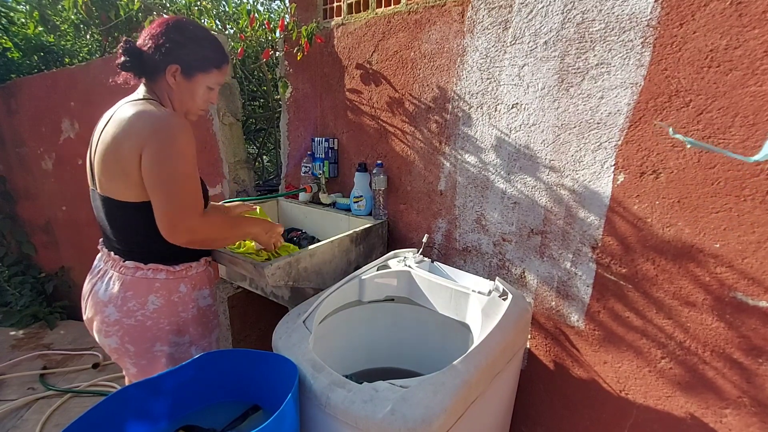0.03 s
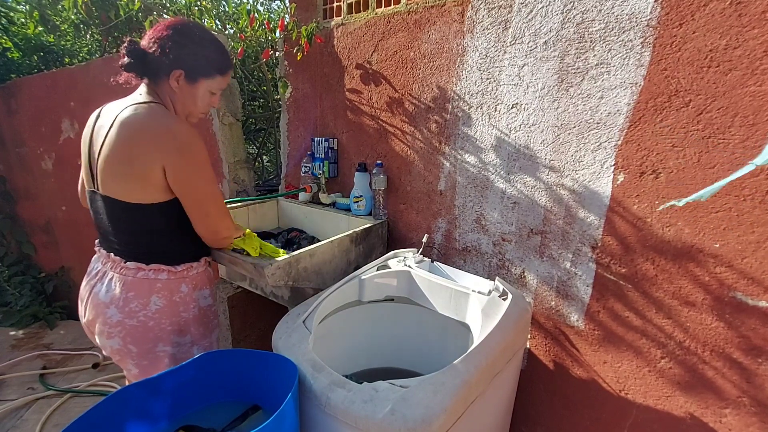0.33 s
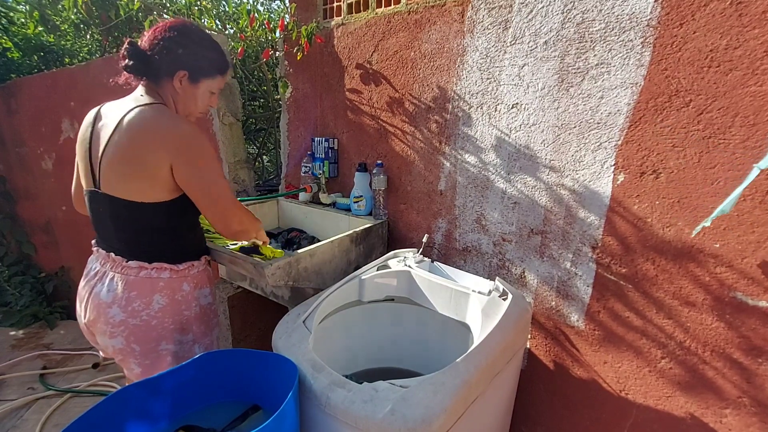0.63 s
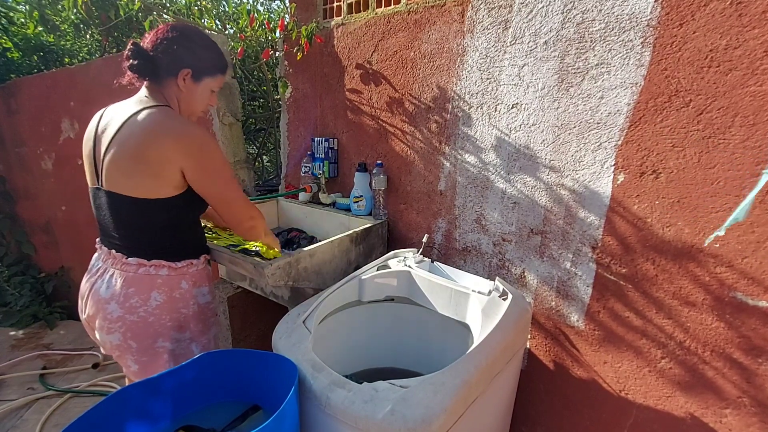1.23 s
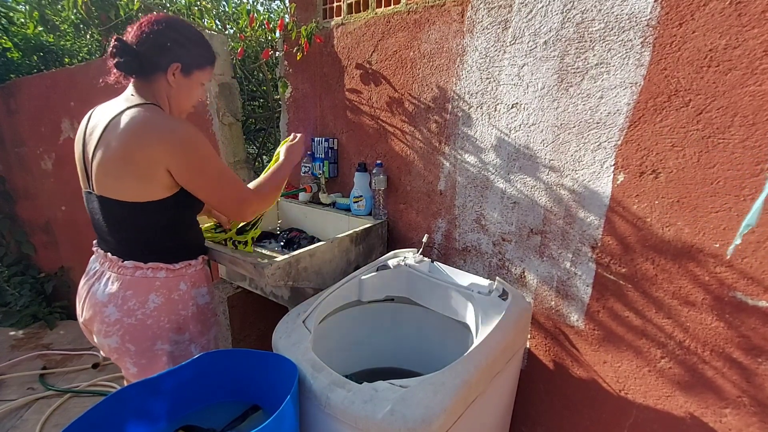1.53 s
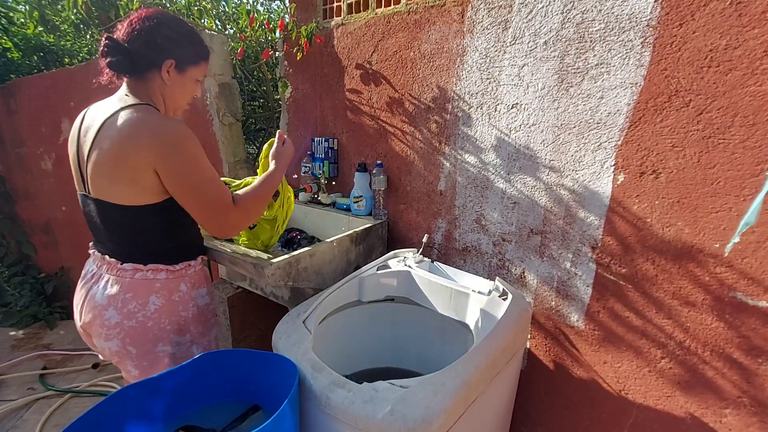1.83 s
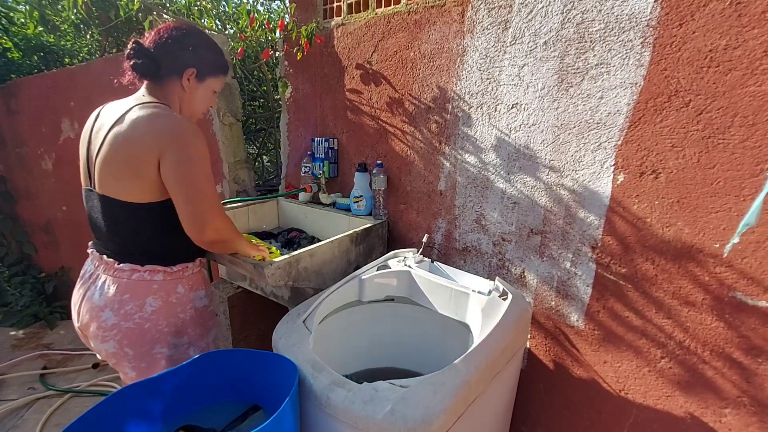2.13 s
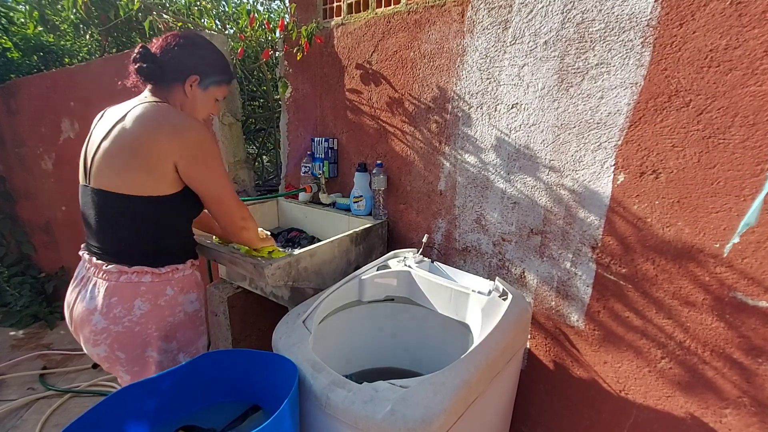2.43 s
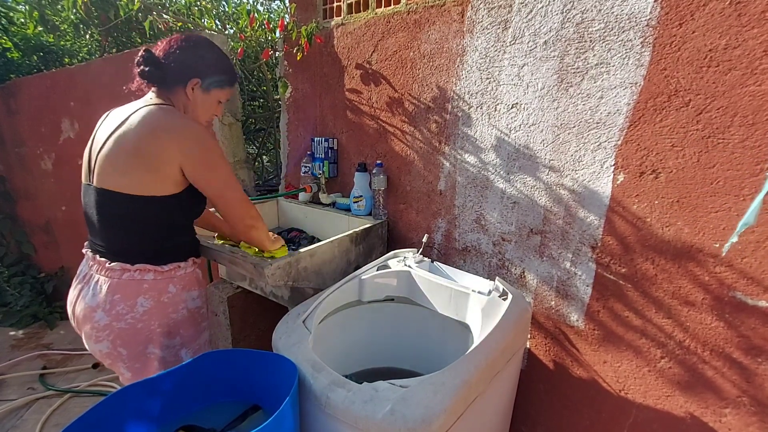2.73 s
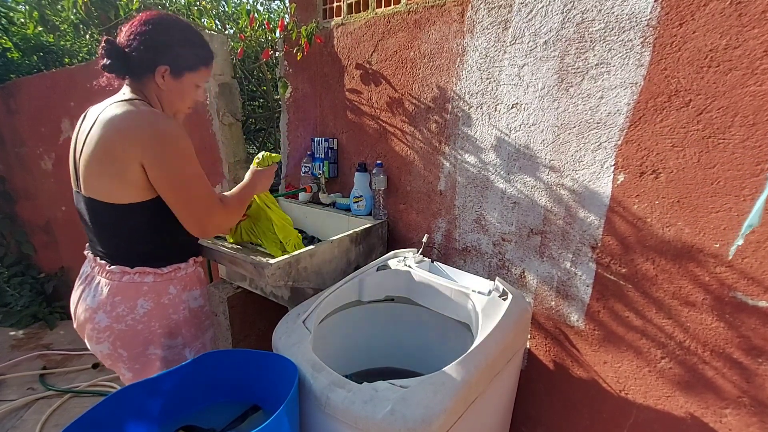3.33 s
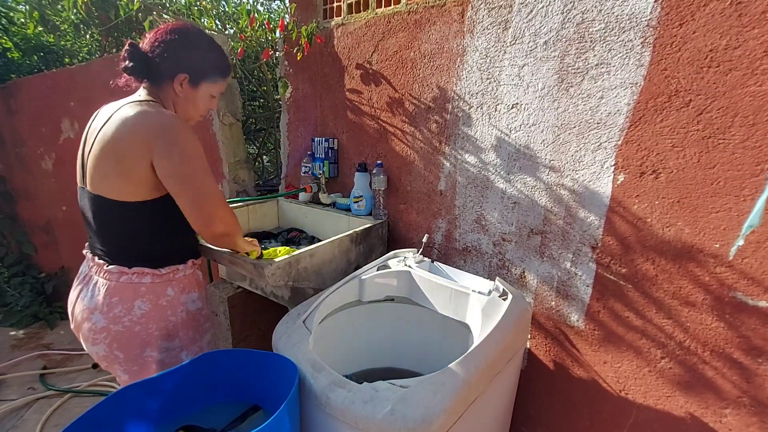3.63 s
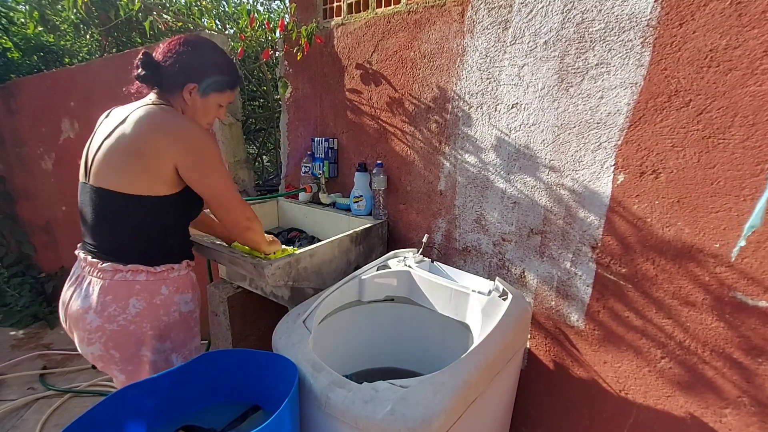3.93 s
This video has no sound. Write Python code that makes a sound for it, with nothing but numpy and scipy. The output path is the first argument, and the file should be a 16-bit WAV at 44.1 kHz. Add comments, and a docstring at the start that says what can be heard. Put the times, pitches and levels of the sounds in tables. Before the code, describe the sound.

Hand-washed laundry swishes and splashes in a nearby sink in a walled yard, lightly at first, then harder, with plops and gurgles. A far engine hums throughout, with faint birds and soft puffs of air on the microphone.

```python
"""Wet cloth is worked in a stone sink in a walled yard. From the start each stroke sloshes, squelches
and sprays, while a distant engine drones over far traffic. Bubbles begin to plop, a puff of air bumps
the microphone, and within the first second birds call faintly. Just after one second a sharp slap comes
and air pockets gurgle. The busiest strokes follow at two seconds and again at three and a half,
and a last puff of air ends the scene."""
import sys
import numpy as np
from scipy import signal
from scipy.fft import rfft, irfft, next_fast_len
from scipy.io import wavfile
from scipy.ndimage import map_coordinates

SR = 44100
rng = np.random.default_rng(int(sys.argv[2]) if len(sys.argv) > 2 else 0)


def unload_audio(sound):
    """Save the sound as a 16-bit wav file, at the path given as the first command line argument."""
    columns = np.transpose(np.atleast_2d(sound))
    # keep every value between -1 and 1, then stretch to whole-number steps
    steps = np.round(np.clip(columns, -1, 1) * 32767)
    wavfile.write(sys.argv[1], SR, steps.astype(np.int16))


N = 176400  # four seconds

# Pushes and slaps of the cloth. Each row: peak time, rise and fall in seconds,
# then the levels of slosh, squelch and spray in dB.
CLOTH_STROKES = [(.03, .23, 0.34, -63.5, -63.5, -64), (.277, .061, 0.027, -52.5, -55, -54),
                 (.409, 0.12, 0.096, -52.5, -58, -56.5), (.61, 0.13, 0.076, -83, -74, -63),
                 (0.962, 0.013, 0.024, -77, -57, -51.5), (1.138, 0.0063, 0.043, -65, -52, -40.5),
                 (1.162, 0.018, 0.024, -51, -47, -42), (1.219, 0.07, 0.03, -51.5, -52, -58.5),
                 (1.271, 0.039, 0.41, -54, -59, -60.5), (1.655, 0.23, 0.037, -64, -62, -62),
                 (1.801, .13, 0.34, -59.5, -61.5, -62), (1.987, 0.031, 0.057, -44, -49, -48),
                 (2.119, 0.15, .09, -51, -56.5, -56), (2.223, 0.062, 0.23, -44, -43.5, -52),
                 (2.299, 0.14, 0.097, -40.5, -42.5, -49.5), (2.536, 0.15, .04, -46.5, -48.5, -54),
                 (2.675, 0.21, 0.15, -49.5, -52.5, -58), (2.785, 0.1, 0.18, -53.5, -55, -60),
                 (3.216, 0.055, 0.05, -49, -58.5, -58), (3.255, 0.0038, 0.0095, -40, -51.5, -48),
                 (3.503, 0.02, 0.06, -46, -44.5, -46.5), (3.562, 0.013, 0.057, -38, -43, -48),
                 (3.665, 0.045, 0.19, -53.5, -56.5, -59.5), (3.743, .036, 0.086, -40.5, -42, -45.5),
                 (3.765, 0.072, .19, -41, -43, -49.5), (3.995, 0.087, 0.074, -51.5, -50.5, -56.5)]
# Tone colours of the low, middle and high water sounds. Each row: frequency in Hz, level in dB.
SLOSH_COLOUR = [(120, -10), (260, 5), (480, 3.5), (1000, 4.5), (1900, 1), (4000, -39)]
SQUELCH_COLOUR = [(700, -6), (1700, -1), (4500, 6), (6200, -0.5), (9000, -17.5)]
SPRAY_COLOUR = [(2500, -26.5), (5500, -10), (8000, -8.5), (11500, -2.5), (15800, -14.5)]
# How the engine runs. Each row: time in seconds, firings per second, level in dB.
ENGINE_RUN = [(0, 52.7, -47), (0.404, 55, -41.5), (1.352, 59, -39.5), (1.798, 66.6, -43.5),
              (3.348, 69.6, -47.5), (3.801, 66.2, -42)]
# Tone colours of exhaust, outdoor air and puffs. Each row: frequency in Hz, level in dB.
EXHAUST_COLOUR = [(60, -43), (135, 6), (195, -9.5), (280, 2), (380, -12), (1500, -50.5)]
AIR_COLOUR = [(25, -57), (40, -3), (80, 0), (170, -19), (330, -15), (1200, -34), (2300, -36), (3000, -42.5),
              (8000, -49), (12000, -42.5), (15800, -52.5)]
PUFF_COLOUR = [(25, -14), (80, 0.5), (150, -9.5), (400, -42.5)]
# Single bubbles and drops. Each row: start in seconds, starting pitch in Hz, level in dB.
BUBBLE_PLOPS = [(.273, 481, -34.5), (1.163, 628, -31), (1.17, 271.6, -24.5), (1.204, 1730, -32),
                (1.303, 2350, -32.5), (1.332, 830, -40.5), (1.488, 1750, -41), (1.831, 865, -37),
                (1.977, 822, -33), (2.237, 470, -29), (2.599, 1800, -35.5), (3.2535, 777, -36)]
# Air on the microphone. Each row: peak time, rise and fall in seconds, level in dB.
AIR_PUFFS = [(.405, 0.034, 0.03, -28.5), (1.42, 0.026, 0.05, -36.5), (3.965, 0.12, 0.11, -25.5)]
# Spray hitting the basin. Each row: start in seconds, level in dB.
SPRAY_TICKS = [(0.4467, -37.5), (3.945, -33)]
# A held bird note. Its row: peak time, rise and fall in seconds, level in dB.
HELD_NOTE = [(.93, 0.44, 1, -66)]
# Bird calls. Each row: start and length in seconds, first and last pitch in Hz,
# bend of the slide (1 is straight), level in dB.
BIRD_CHIRPS = [(0.719, 0.058, 8630, 6230, 0.8, -54), (2.11, 0.089, 9170, 7500, 1.9, -53.5)]
# Air pockets under the cloth. Each row: start in seconds, starting pitch in Hz, level in dB.
AIR_POCKETS = [(1.174, 827, -45), (1.32, 1400, -56), (2.295, 1135, -45.5), (2.712, 900, -50.5),
               (3.498, 1106, -43.5), (3.528, 1062, -44.5), (3.549, 1212, -40)]
# Echoes of walls and hedges. Each row: frequency in Hz, seconds to fade by 60 dB.
YARD_ECHO = [(300, 0.22), (12000, 0.047)]
HEDGE_ECHO = [(8000, 0.42)]


def amp(db):
    """Turn decibels into a number to multiply by."""
    return 10 ** (np.asarray(db) / 20)


def unit(x):
    """Scale a sound to an average (rms) strength of 1."""
    return x / np.sqrt(np.mean(x ** 2) + 1e-20)


def along(points, hz):
    """Read between a table's rows, on a scale of octaves."""
    freqs, values = np.transpose(points)
    return np.interp(np.log(hz + 1), np.log(freqs + 1), values)


def filtered(x, response):
    """Multiply each frequency in a sound by response(hz)."""
    size = next_fast_len(N + SR // 2)
    return irfft(rfft(x, size) * response(np.fft.rfftfreq(size, 1 / SR)), size)[..., :N]


def coloured(x, colour):
    """Give a sound a tone colour that fades out past the table's ends."""
    closed = [(colour[0][0] / 2, -90), *colour, (colour[-1][0] * 2, -90)]
    return unit(filtered(x, lambda hz: amp(along(closed, hz))))


def wobble(per_s):
    """A smooth curve through per_s random values a second."""
    return map_coordinates(rng.standard_normal(int(N * per_s / SR) + 4), [np.arange(N) * per_s / SR])


def spread(pair, side_db):
    """Make stereo: one sound is the middle, the other adds width."""
    side = amp(side_db) * pair[1]
    return unit(np.array([pair[0] + side, pair[0] - side]))


def noise(colour, side_db):
    """Stereo noise with a tone colour."""
    return spread(coloured(rng.standard_normal((2, N)), colour), side_db)


def swells(rows):
    """A loudness curve: each swell gains 20 dB over its rise and loses 20 dB over its fall."""
    t = np.arange(N) / SR
    return np.sqrt(sum(amp(db - 20 * np.maximum((peak - t) / rise, (t - peak) / fall)) ** 2
                       for peak, rise, fall, db in rows))


def add(track, start_s, sound):
    """Mix a sound in at a given time."""
    part = track[max(round(start_s * SR), 0):][:len(sound)]
    part += sound[:len(part)]


def echo(x, fade_times):
    """A blurred stereo echo; the table sets how fast each frequency fades."""
    hz, t, bands = signal.stft(rng.standard_normal((2, SR // 2)), SR, nperseg=256)
    tail = signal.istft(bands * amp(-60 * t / along(fade_times, hz)[:, None]), SR, nperseg=256)[1]
    delayed = np.pad(x, (90, 0))[None]
    return signal.fftconvolve(delayed, tail / np.linalg.norm(tail[0]), axes=1)[:, :N]


def bubbling(per_s, centre_hz, cycles, scatter_db, width, samples):
    """Tiny bubbles ring at random times and pitches, fading 60 dB in `cycles` vibrations."""
    when, pitch, strength, place, flip = rng.random((5, int(per_s * N / SR), 1))
    turns = centre_hz * 2 ** (2 * pitch - 1) * np.arange(samples) / SR
    decay = amp(scatter_db * strength - 60 * turns / cycles) * np.sign(flip - .5)
    at = ((when * N).astype(int) + np.arange(samples)).ravel()
    channels = [decay * np.sin(2 * np.pi * turns + side * width * (2 * place - 1)) for side in (1, -1)]
    return unit(np.array([np.bincount(at, ring.ravel(), N)[:N] for ring in channels]))


def water_layer(layer, colour, bubbles, rush_db, side_db):
    """Bubbles over a rush of water, both following the strokes."""
    strokes = swells([(*row[:3], row[3 + layer]) for row in CLOTH_STROKES])
    rush = amp(rush_db) * spread(rng.standard_normal((2, N)), side_db)
    flicker = amp(2.46 * wobble(110))
    return strokes * flicker * coloured(bubbles + rush, colour)


def cloth():
    """Each stroke sloshes the water, squelches foam through the weave and throws fine spray."""
    large = bubbling(per_s=600, centre_hz=779, cycles=9.7, scatter_db=9, width=1.0, samples=1400)
    slosh = water_layer(0, SLOSH_COLOUR, large, rush_db=9, side_db=-10)
    foam = bubbling(per_s=1400, centre_hz=3090, cycles=11.4, scatter_db=5, width=0.67, samples=400)
    squelch = water_layer(1, SQUELCH_COLOUR, foam, rush_db=2, side_db=-1)
    fine = bubbling(per_s=900, centre_hz=9500, cycles=5.2, scatter_db=26, width=1.4, samples=80)
    spray = water_layer(2, SPRAY_COLOUR, fine, rush_db=1, side_db=1)
    spurts = amp(2.6 * np.tanh(wobble(45)))  # the cloth grips and slips, so water leaves unevenly
    return (slosh + squelch + spray) * spurts


def droplets():
    """Large, medium and small droplets plink off the cloth as it is handled."""
    squelch = swells([(*row[:3], row[4]) for row in CLOTH_STROKES])
    handling = squelch.mean() * (squelch / squelch.mean()) ** 0.54  # swells less than the strokes
    patter = sum(bubbling(per_s=45, centre_hz=hz, cycles=24, scatter_db=20, width=0.84, samples=900)
                 for hz in (1283, 2020, 4230))
    return amp(-7) * handling * patter


def engine():
    """A distant engine's firings make a low drone, each with a gritty exhaust pulse."""
    times, hz, db = np.transpose(ENGINE_RUN)
    t = np.arange(N) / SR
    firing_hz = np.interp(t, times, hz) * (1 + 0.01206 * wobble(25))
    phase = 2 * np.pi * np.cumsum(firing_hz) / SR
    drone = amp(np.interp(t, times, db) + 3.1 * wobble(22.1)) * np.sqrt(2) * np.sin(phase)
    pulses = unit(np.diff(phase // (2 * np.pi), prepend=0))
    grit = unit((1 + np.cos(phase)) ** 2) * rng.standard_normal(N)
    return drone + amp(-53.5) * coloured(pulses + grit, EXHAUST_COLOUR)


def traffic():
    """Far traffic rumbles in still air."""
    return amp(-47 + wobble(0.62)) * noise(AIR_COLOUR, side_db=-4)


def plops_and_ticks(rise_per_s=6.2, life_cycles=29.3, tick_fade_s=0.021):
    """Larger bubbles burst with a splash and ring upward in pitch; flung drops tick on the basin."""
    out, t = np.zeros(N), np.arange(SR // 6) / SR
    splash, hiss = (coloured(rng.standard_normal(N), colour) for colour in (SLOSH_COLOUR, SPRAY_COLOUR))
    random_piece = lambda x: np.roll(x, rng.integers(N))[:len(t)]
    for start, hz, db in BUBBLE_PLOPS:
        turns = hz * (t + rise_per_s * t * t / 2)
        ring = (1 - np.exp(-turns)) * np.sin(2 * np.pi * turns)
        burst = 0.3 * np.exp(-t / 0.0019) * random_piece(splash)
        add(out, start, amp(db - 60 * turns / life_cycles) * (ring + burst))
    for start, db in SPRAY_TICKS:
        add(out, start, amp(db - 60 * t / tick_fade_s) * .5 * random_piece(hiss))
    return out


def puffs():
    """Puffs of air hit the microphone with low bumps."""
    return swells(AIR_PUFFS) * noise(PUFF_COLOUR, side_db=-3)


def far_bird(pitch_hz=2126):
    """A distant bird holds a faint, wavering note, heard only as an echo."""
    hz = pitch_hz * (1 + 0.0456 * wobble(90))
    note = np.sin(2 * np.pi * np.cumsum(hz) / SR)
    return swells(HELD_NOTE) * unit(echo(note, HEDGE_ECHO))


def chirping_bird():
    """Thin, falling whistles linger among walls and hedges."""
    calls = np.zeros(N)
    for start, length, first, last, bend, db in BIRD_CHIRPS:
        progress = np.arange(int(length * SR)) / (length * SR)
        warble = 1 + .005 * wobble(402)[:len(progress)]
        hz = (first + (last - first) * progress ** bend) * warble
        loudness = amp(db) * np.sqrt(2) * np.sin(np.pi * progress ** 2)
        add(calls, start, loudness * np.sin(2 * np.pi * np.cumsum(hz) / SR))
    return amp(-8) * calls + echo(calls, HEDGE_ECHO)


def gurgles(swell_s=0.0071, octaves_per_s=24, churn_hz=229):
    """Air pockets open under the cloth: each rough note swells, sinks in pitch and dies away."""
    out, t = np.zeros(N), np.arange(SR // 8) / SR
    swell = t / swell_s * np.exp(1 - t / swell_s)
    for start, hz, db in AIR_POCKETS:
        phase = 2 * np.pi * np.cumsum(hz * 2 ** (-octaves_per_s * t)) / SR
        churn = (wobble(churn_hz) + 1j * wobble(churn_hz))[:len(t)]
        rough_note = np.real(churn * np.exp(1j * phase))
        add(out, start, amp(db) * np.sqrt(np.mean(swell ** 2)) * unit(swell * rough_note))
    return out


def in_yard(water, left_lead_s=0.00015, mono_below_hz=560):
    """The sink stands a little to the left, with echoing walls close by."""
    shifted = filtered(water, lambda hz: np.exp(1j * np.pi * hz * left_lead_s * np.array([[1], [-1]])))
    left, right = shifted * amp([[.5], [-.5]]) + amp(-9.5) * echo(water[0], YARD_ECHO)
    mid = (left + right) / 2
    # Low sounds have long waves, which reach both sides of the microphone alike.
    side = filtered((left - right) / 2, lambda hz: hz / np.hypot(hz, mono_below_hz))
    return np.array([mid + side, mid - side])


def scene():
    """Mix the water in the sink with the outdoor sounds."""
    water = cloth() + droplets() + plops_and_ticks() + gurgles()
    return in_yard(water) + engine() + chirping_bird() + far_bird() + traffic() + puffs()


def record(dry, top_hz=15850):
    """Cut away the very highest treble."""
    return filtered(dry, lambda hz: hz < top_hz)


dry = scene()
out = record(dry)
unload_audio(out)
```